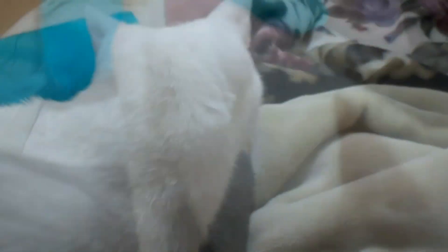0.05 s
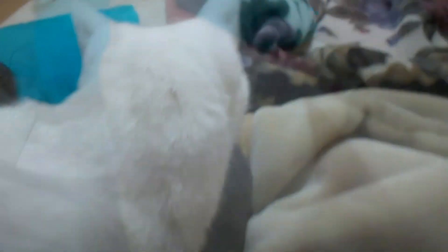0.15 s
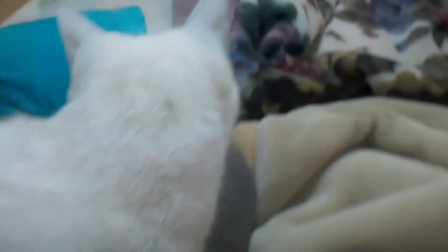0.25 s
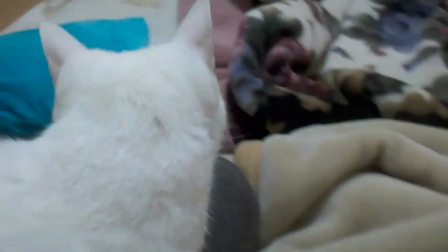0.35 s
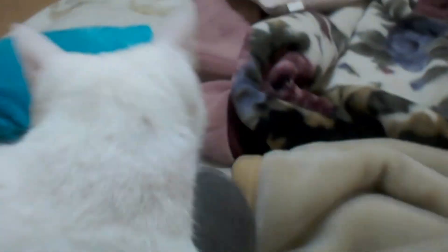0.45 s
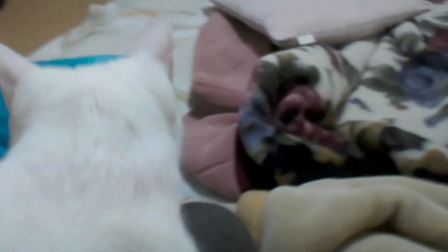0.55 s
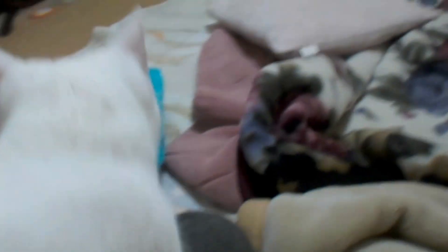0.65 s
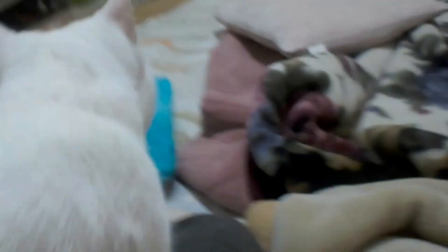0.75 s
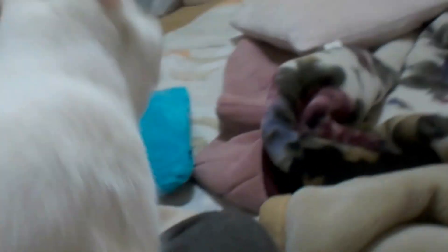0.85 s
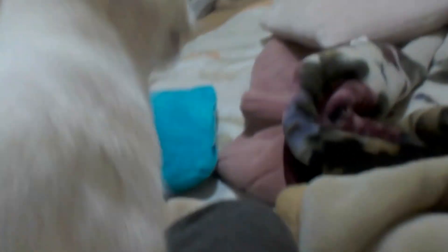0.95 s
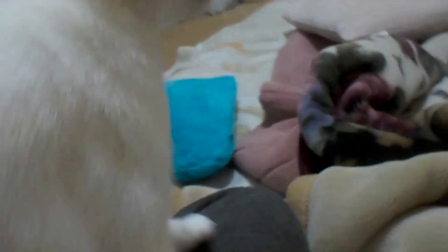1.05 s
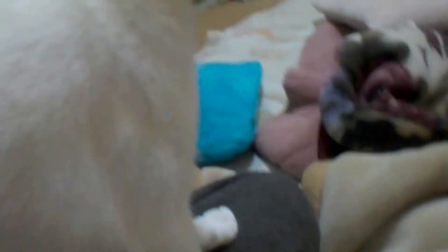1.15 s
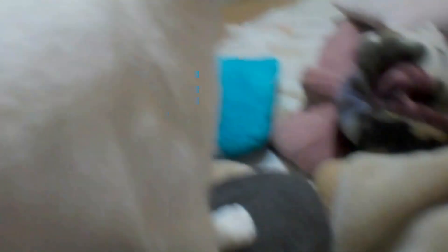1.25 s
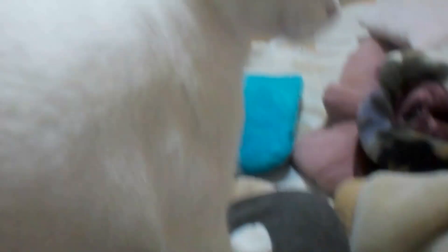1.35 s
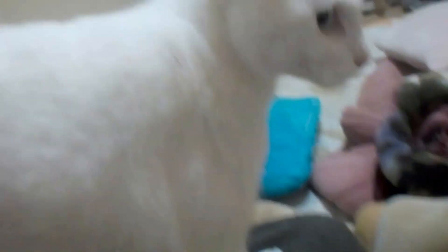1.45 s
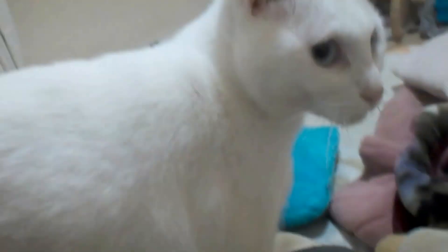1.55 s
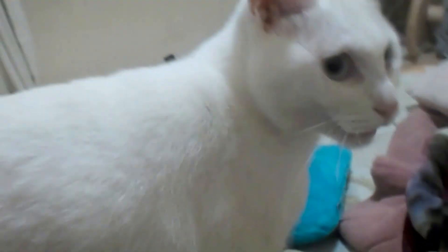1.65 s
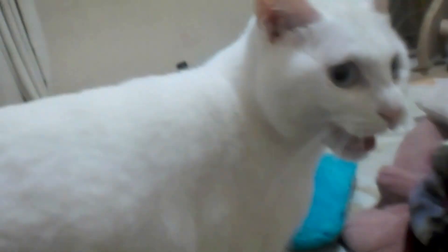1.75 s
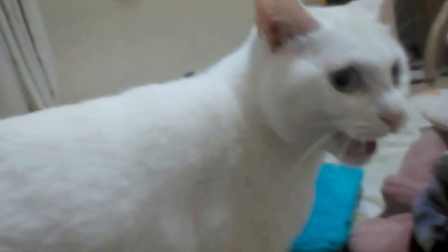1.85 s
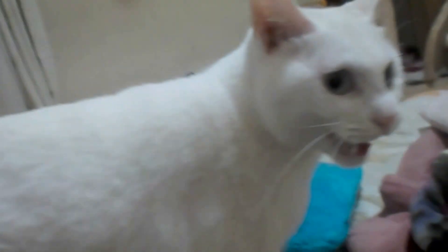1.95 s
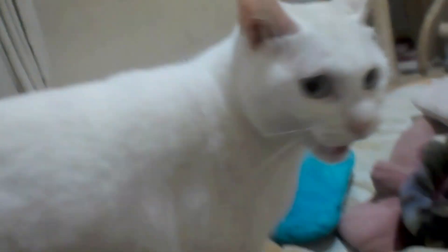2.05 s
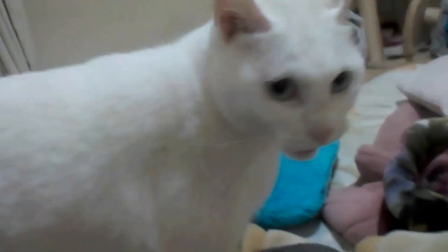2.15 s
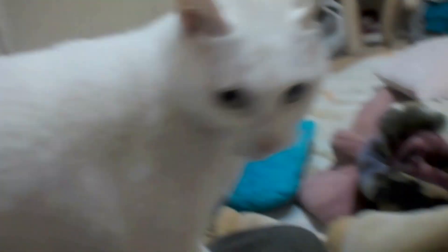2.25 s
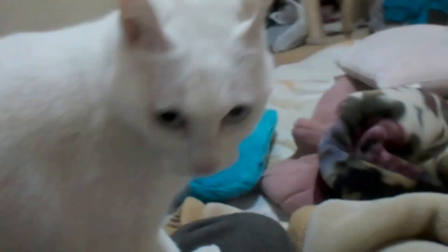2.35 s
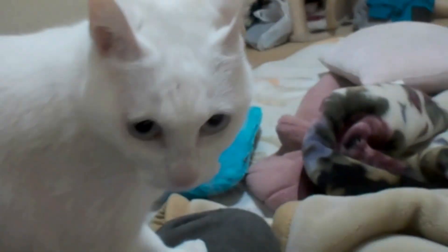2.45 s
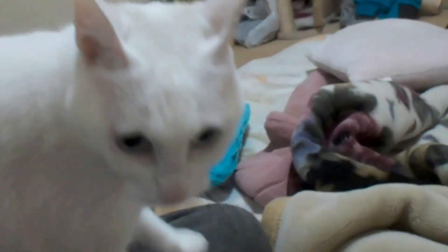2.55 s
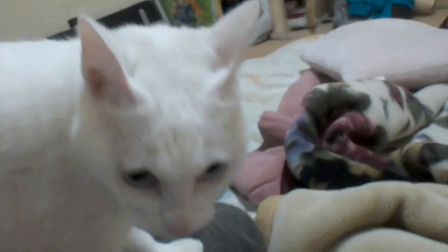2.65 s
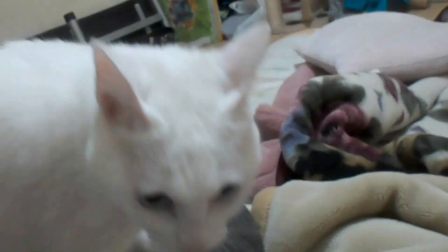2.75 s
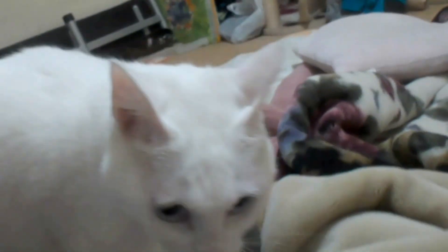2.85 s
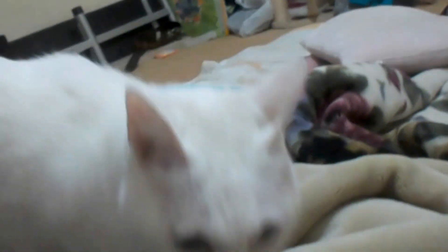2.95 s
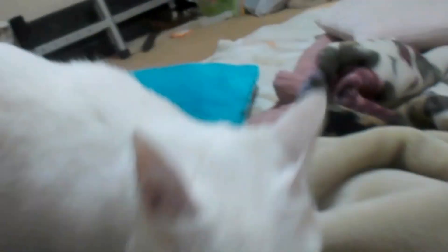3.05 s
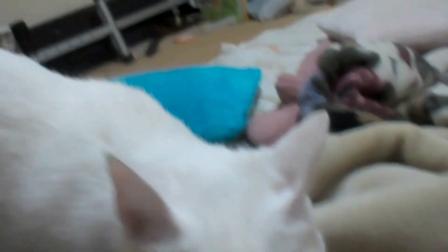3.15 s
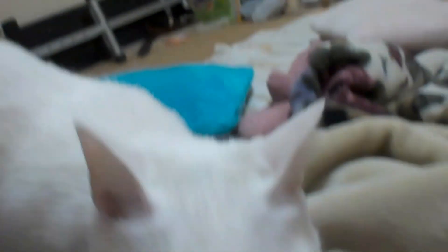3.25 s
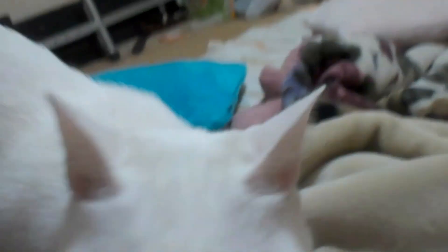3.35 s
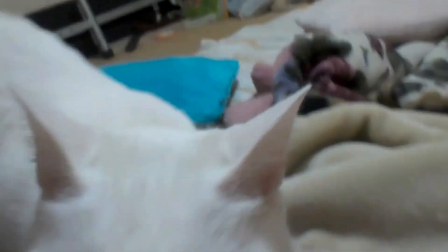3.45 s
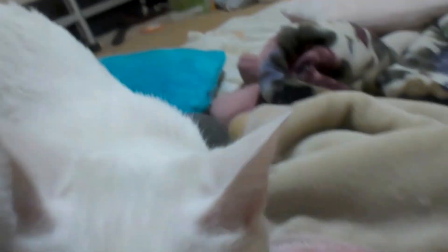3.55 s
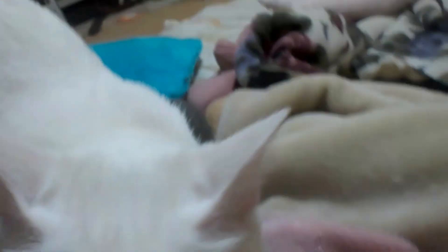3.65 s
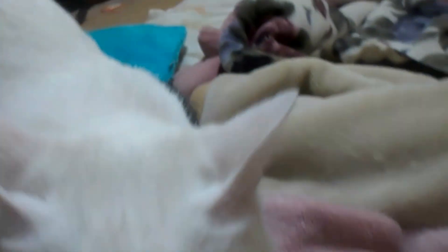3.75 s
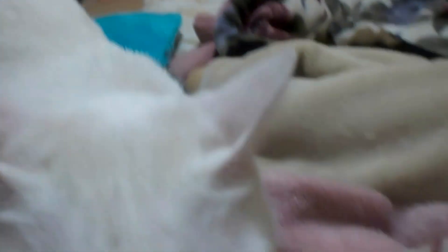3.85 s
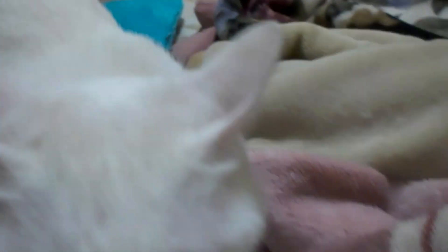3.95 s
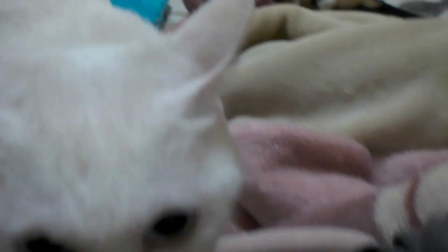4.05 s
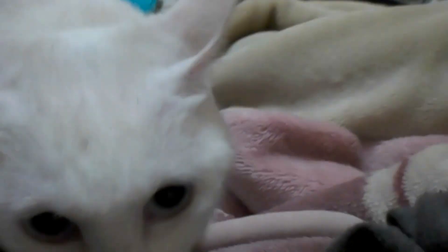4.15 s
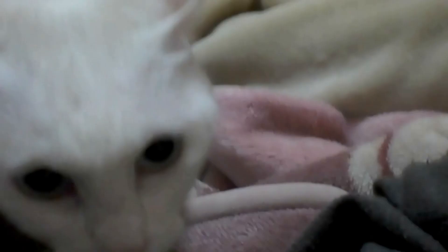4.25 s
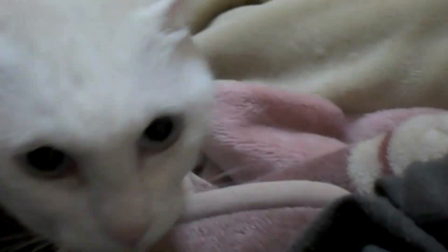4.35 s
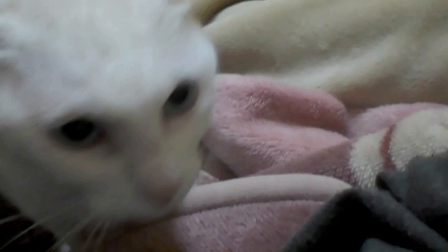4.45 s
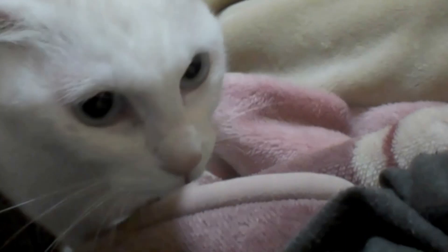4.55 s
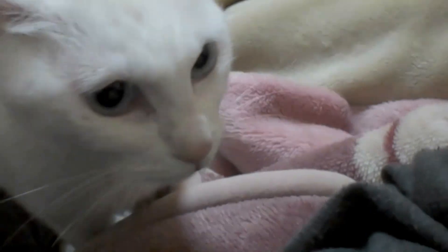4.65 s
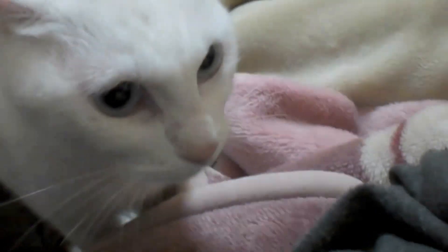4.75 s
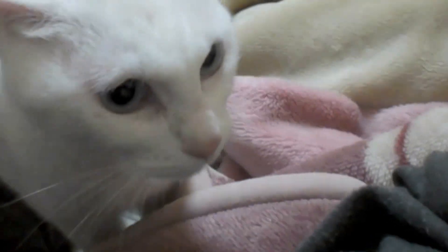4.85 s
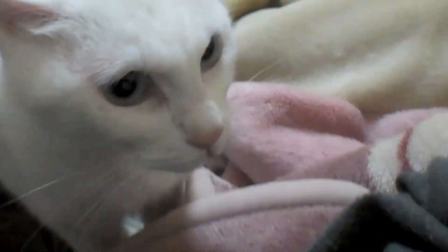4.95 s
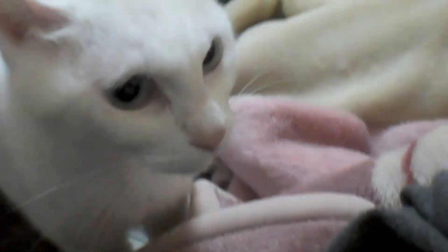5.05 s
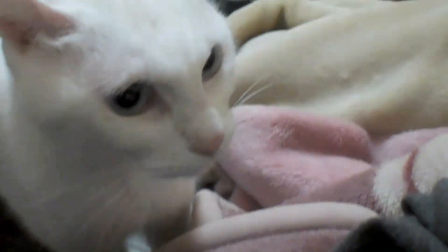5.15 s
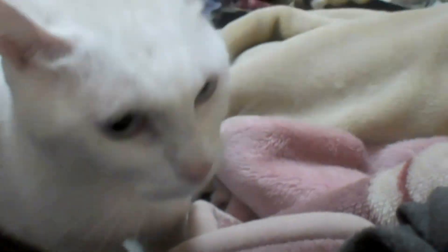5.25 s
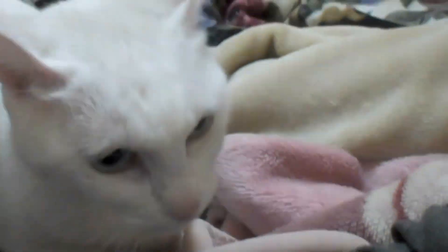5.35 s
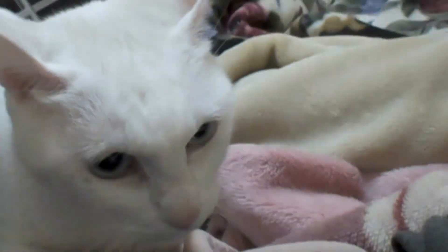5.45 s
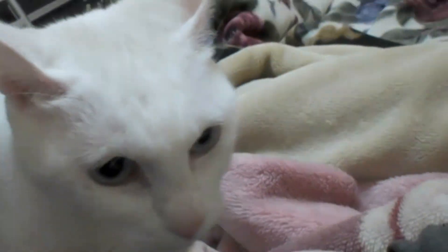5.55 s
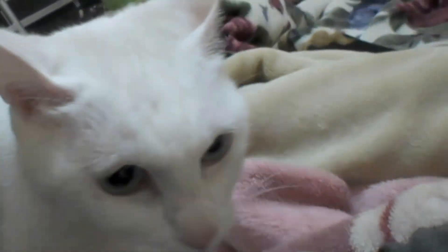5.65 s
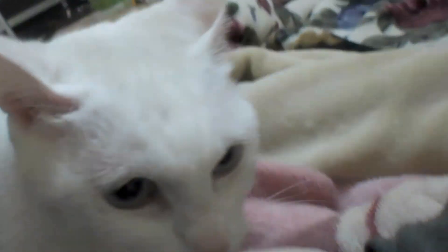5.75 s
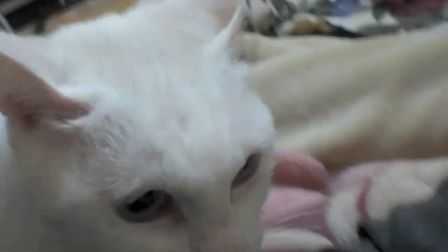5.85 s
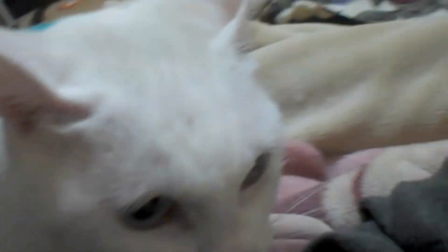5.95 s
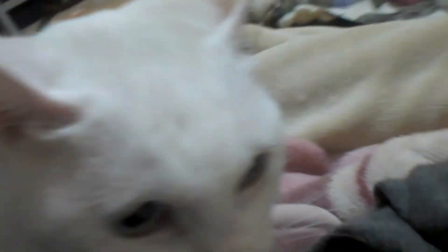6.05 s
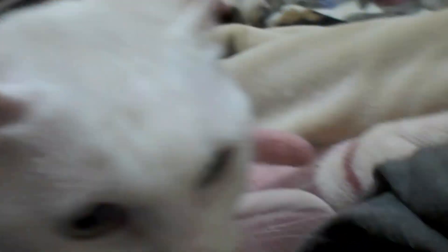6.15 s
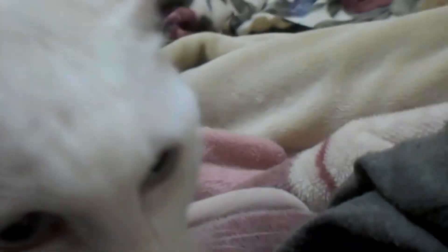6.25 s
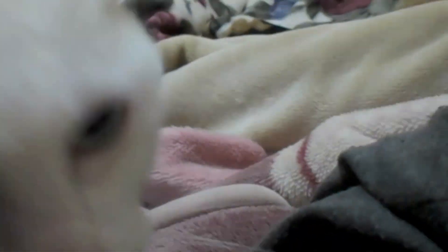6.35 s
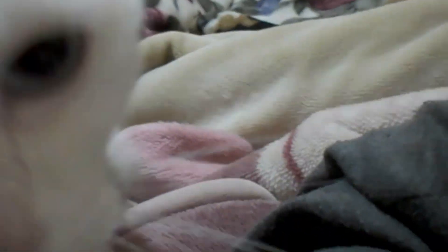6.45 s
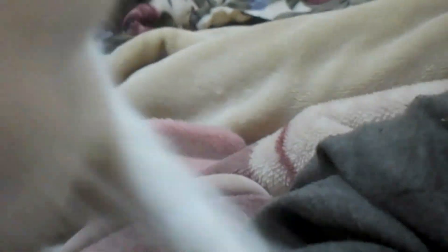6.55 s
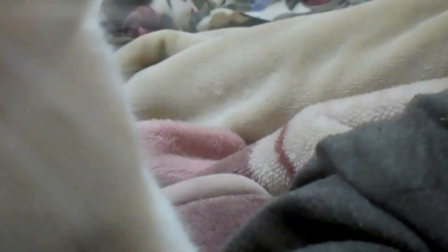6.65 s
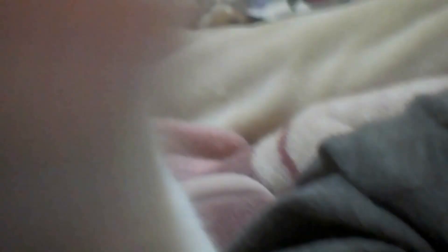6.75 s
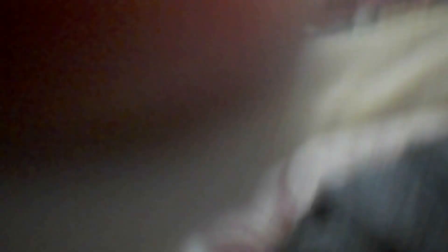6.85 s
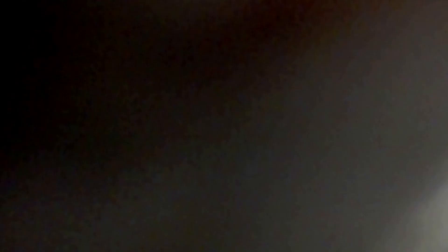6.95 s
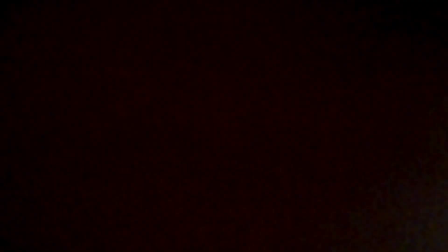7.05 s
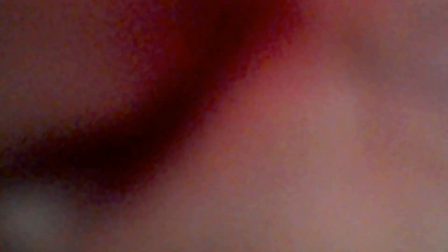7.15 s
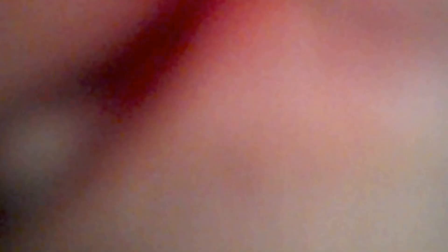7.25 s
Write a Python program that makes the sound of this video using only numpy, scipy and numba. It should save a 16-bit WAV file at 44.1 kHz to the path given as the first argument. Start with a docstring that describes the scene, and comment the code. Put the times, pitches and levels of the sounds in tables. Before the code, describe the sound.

A purring cat gives purr-shaken meows and one hoarse rattle close to a phone, with sharp knocks, ending in fur rubbing and thudding on the microphone.

```python
"""In a small bedroom with a low hum, a purring cat on a blanket meows four times close to a phone.
The meows are vocal fold pulses and breath, chopped and shaken by the purr, through moving resonances;
each call swells, clears, breaks and shuts, and the third is only a hoarse rattle.
The purr is a deep tone with filtered thumps. Knocks on the phone, and three dull purr thumps as the cat
comes close, are short decaying rings; cloth swipes are shaped noise, and at the end the cat rubs its fur
over the microphones as grainy noise."""
import sys
import numpy as np
from scipy import signal
from scipy.fft import rfft, irfft
from scipy.io import wavfile
from scipy.ndimage import uniform_filter1d
from numba import njit

SR = 44100
rng = np.random.default_rng(int(sys.argv[2]) if len(sys.argv) > 2 else 0)


def bounce(signal):
    """Save signal as a 16-bit WAV file at the path given by the first command-line argument."""
    frames = np.transpose(np.atleast_2d(signal))
    limited = np.clip(frames, -1, 1)
    pcm = np.round(limited * 32767).astype(np.int16)
    wavfile.write(sys.argv[1], SR, pcm)


N = 322371
TIME = np.arange(N) / SR


def from_db(db):
    """Decibels to amplitude gain."""
    return 10 ** (np.asarray(db) / 20)


def rms_one(x):
    """Scale to unit power."""
    return x / np.sqrt(np.mean(x ** 2) + 1e-20)


def ramp(t, length):
    """From 0 to 1 over a length of time."""
    return np.clip(t / length, 0, 1)


def curves(rows, t=TIME):
    """Each column of a table, joined by straight lines in time."""
    s, *columns = np.transpose(rows)
    return [np.interp(t, s, c) for c in columns]


def at_hz(points, size):
    """A spectrum table read on the FFT grid of a signal, along log frequency."""
    hz, value = np.transpose(points)
    return np.interp(np.log(np.fft.rfftfreq(size, 1 / SR) + 1), np.log(hz), value)


def colour(x, spectrum):
    """Weight a sound by a smooth spectrum; rms 1."""
    size = x.shape[-1]
    return rms_one(irfft(rfft(x) * from_db(at_hz(spectrum, size)), size))


def cut(x, hz, kind, order=2):
    """Butterworth filter."""
    sos = signal.butter(order, np.clip(hz, 10, .45 * SR), kind, fs=SR, output="sos")
    return signal.sosfilt(sos, x + 1e-18)


def drift(rate_hz, size=N):
    """Random wander with rms 1: straight lines between two random points per cycle of the rate."""
    steps = np.arange(size) * rate_hz * 2 / SR
    return rms_one(np.interp(steps, np.arange(N // 4), rng.standard_normal(N // 4)))


def pan(db):
    """Left and right gains that differ by so many dB, with a mean of 1."""
    gains = from_db(np.array([[.5], [-.5]]) * db)
    return gains / gains.mean(axis=0)


@njit
def sweep(x, angle, r):
    """Two-pole resonance whose centre moves; gain about 1 on top."""
    y = np.zeros(len(x))
    for i in range(2, len(x)):
        drive = (1 - r * r) / 2 * (x[i] - x[i - 2])
        y[i] = drive + 2 * r * np.cos(angle[i]) * y[i - 1] - r * r * y[i - 2]
    return y


def resonate(x, hz, width_hz):
    """A resonance with a steady or moving centre."""
    return sweep(x, 2 * np.pi * hz / SR * np.ones(len(x)), np.exp(-np.pi * width_hz / SR))


def even(x):
    """Hold the short-term power near 1."""
    return x / np.sqrt(np.abs(uniform_filter1d(x * x, size=900)) + 1e-14)


def background(waver_db=2.93, wander_rad=0.27):
    """Room air and a low wavering hum, whose upper lines fade as the cat steps in front of the phone."""
    # spectrum of the room air: (f/Hz, relative level/dB)
    air_colour = [(15,-39.5),(25,-20),(50,-5.5),(75,-4),(236,-16.5),(500,-17.5),(660,-21.5),(1370,-22.5),(3000,-30.5),(7000,-39),(13000,-50),(16000,-61)]
    # room air, which sinks as the cat steps in front of the phone: (t/s, level/dB)
    air_level = [(0,-57),(.5,-54),(1.2,-53.5),(1.7,-57),(4.7,-60.5),(7.31,-57)]
    # hum lines, before they waver: (f/Hz, level at first/dB, level later/dB)
    hum = [(65.5,-54,-53),(107.2,-62,-63),(162.5,-60.5,-75)]
    # likeness of left and right: (f/Hz, likeness 0-1)
    likeness = [(30,1),(500,0.916),(2000,0.64),(5000,0.098),(15000,1)]
    mid, side = rfft(rng.standard_normal((2, N)))
    alike = np.clip(at_hz(likeness, N), 0, 1)
    air = irfft(np.sqrt(1 + alike) * mid + np.sqrt(1 - alike) * side * [[1], [-1]], N)
    out = from_db(curves(air_level)[0]) * colour(air, air_colour)
    for hz, first_db, later_db in hum:
        level_db = np.interp(TIME, [1.05, 1.4], [first_db, later_db]) + waver_db * drift(4)
        line = np.sin(2 * np.pi * hz * TIME + wander_rad * drift(2.4))
        out += np.sqrt(2) * from_db(level_db) * line
    return out


def whine():
    """A faint electronic whine, a tone and its octave, that switches on and off 14.56 times a second."""
    switch = uniform_filter1d(1. * (np.cos(2 * np.pi * 14.56 * (TIME - 2.435)) > .1), size=100)
    phase = 2 * np.pi * 7165 * TIME + .6 * drift(60)
    return from_db(-76) * switch * (np.sin(phase) + from_db(-7) * np.sin(2 * phase))


def purring(closing_db=-6, uneven_db=3, puff=0.077):
    """The larynx opens and closes once a cycle: two soft thumps with a puff of air, over a deep fundamental."""
    # purr speed, before its slight wander: (t/s, f/Hz)
    speed = [(0,31.4),(1.2,31.4),(2.1,28.5),(2.5,29),(3.1,33.2),(3.6,28.3),(4.3,29),(4.9,27.1),(5.6,31.7),(7.3,38.3)]
    # deep fundamental: (t/s, level/dB)
    deep = [(0.0, -71), (1.35, -55), (1.59, -63), (2.37, -49), (3.26, -49.5), (6.09, -63), (6.63, -57),
            (6.65, -54)]
    # thumps and puffs together: (t/s, level/dB)
    flutter_level = [(0,-76),(.35,-53),(.85,-75),(1.2,-59),(1.9,-67),(3.2,-55.5),(4.6,-55),(4.95,-50.5),(5.5,-60.5),(6.2,-64),(6.4,-54.5),(7.3,-48.5)]
    # colour of thumps and puffs: (f/Hz, relative level/dB)
    flutter_colour = [(40,-25.5),(90,7),(140,6.5),(280,-2),(430,-2.5),(600,-22),(1500,-34),(5000,-32.5),(9000,-59)]
    (rate,), (deep_db,), (flutter_db,) = curves(speed), curves(deep), curves(flutter_level)
    turns = np.cumsum(rate * (1 + 0.014 * drift(7.4))) / SR
    opens = np.diff(np.floor(turns), prepend=0)
    closes = np.diff(np.floor(turns + 0.67), prepend=0)
    thumps = (opens + from_db(closing_db) * closes) * from_db(uneven_db * drift(25))
    puffs = puff * rng.standard_normal(N) * np.cos(np.pi * turns) ** 8
    flutter = colour(cut(thumps + 0.44 * puffs, 60, "high"), flutter_colour)
    fundamental = np.sqrt(2) * np.cos(2 * np.pi * turns)
    return from_db(deep_db) * fundamental + from_db(flutter_db) * flutter


def brushes(grain_db=3):
    """Short scratchy swipes of cloth: coloured, grainy noise that starts at once and dies away."""
    # swipes: (t/s, level at the start/dB, time to fall 60 dB/s, left minus right/dB)
    swipes = [(0.55,-51,0.98,-10),(0.568,-34,0.08,-21),(0.593,-45.5,0.49,-7),(3.472,-58.5,0.37,-13),(3.557,-49.5,0.15,-16),(5.18,-47.5,0.042,1)]
    # colour of the cloth: (f/Hz, relative level/dB)
    cloth_colour = [(120, -42), (200, -15), (789, -13), (1240, -5), (1880, -10), (2130, -8.5),
                    (2700, -12.5), (8260, -28.5), (15000, -50)]
    swell = 0
    for s, db, t60, side_db in swipes:
        fade = from_db(db - 60 * np.clip((TIME - s) / t60, 0, 2))
        swell = swell + pan(side_db) * (TIME >= s) * fade
    return swell * colour(rng.standard_normal(N) * from_db(grain_db * drift(600)), cloth_colour)


def knocks_and_thumps(cycles=3.84, crack_t60=0.0029, crack_top_hz=7500, body_db=-20, body_cycles=22,
                      port_lag_s=0.00011):
    """Knocks on the phone and three dull purr thumps: each a ring of a few cycles, a crack and a faint tail."""
    # knocks, and from 6.73 s to 6.804 s the purr thumps of the nearing cat: (t/s,
    # ring level before filtering/dB, ring f/Hz, crack level against ring/dB, left minus right/dB)
    hits = [(0.5691,-16.5,2200,-22,-9),(0.5703,-21.5,507,-27,-9),(0.5762,-17,2610,-23,-24),(.634,-18,1570,-6,-2),(0.649,-2.2,3170,-3,-22),(0.725,-18.5,960,-18,-25),(.860,-22.5,990,-17,-11),(0.9586,-19.5,1100,-21,-12),(1.0332,-24,1580,-30,-1),(2.654,-34,1220,-25,-1),(3.4694,-21.5,1040,-24,-9),(5.179,-40.5,1490,-5,-7.5),(6.73,-25,228.3,-34,-3.5),(6.767,-21.5,197,-37,-4.5),(6.804,-20.5,248,-33,-7),(6.849,-2,3000,-10,-19),(6.8509,-13.5,1980,1.5,-21),(6.8579,-6.5,880,-14,4.5),(6.8984,-2.5,2530,-7.5,-19.5),(6.953,-19,2190,-26,-21),(7.0299,0,675,-43,6),(7.038,0.5,515,-39,-1),(7.0639,-5,890,-40,1),(7.1615,-30,890,-27,8),(7.2319,-3.5,1150,-38,3)]
    out, t = np.zeros((2, N)), np.arange(2400) / SR
    for s, db, hz, crack_db, side_db in hits:
        crack, tail = rng.standard_normal((2, len(t)))
        hit = np.sin(2 * np.pi * hz * t) * from_db(-60 * t * hz / cycles)
        # few overtones keep the onset soft
        hit = cut(cut(hit, hz / 4, "high", order=1), hz * 5, "low")
        crack = cut(crack, [1500, crack_top_hz], "band") * from_db(-60 * t / crack_t60)
        hit += from_db(crack_db) * crack / np.abs(crack).max()
        tail = rms_one(cut(tail, [hz / 2, hz * 2], "band"))
        hit += from_db(body_db - 60 * t * hz / body_cycles) * tail
        hit = cut(hit, 11000, "low", order=4)
        # the sound reaches the left port a little later
        both = np.array([np.interp(t - port_lag_s, t, hit, left=0), hit])
        at = int(s * SR)
        out[:, at:at + len(t)] += (from_db(db) * both * pan(side_db))[:, :N - at]
    return out


def loudness(age, effort, strength):
    """Mouth, throat and treble levels in dB: the bright parts follow effort more than the throat does."""
    throat_follows, treble_follows, treble_sags = 0.41, 0.73, 0.13  # shares of the mouth's swell and sag
    _, swell_s, sag_s, swell_db, sag_db, release_t60 = effort
    swell = swell_db * (1 - ramp(age, swell_s)) ** 2
    sag = sag_db * ramp(age - swell_s, sag_s) ** 2
    release = 60 * np.maximum(age - swell_s - sag_s, 0) / release_t60
    mouth_db, throat_db, treble_db, _ = strength
    return (mouth_db - swell - sag - release, throat_db - throat_follows * swell - release,
            treble_db - treble_follows * swell - treble_sags * sag - release)


def hoarseness(age, voicing, catch_width_s, break_width_s=0.013):
    """Roughness and purr depth: hoarse at both ends, clearer between, with the purr creeping back in."""
    catch_s, clear_s, clear_rough, hoarse_rough, clear_purr, hoarse_purr = voicing
    caught = (1 + np.tanh((age - catch_s) / (2 * catch_width_s))) / 2
    unbroken = (1 - np.tanh((age - catch_s - clear_s) / (2 * break_width_s))) / 2
    clear = caught * unbroken
    rough = clear * clear_rough + (1 - clear) * hoarse_rough
    purr = clear * clear_purr * ramp(age - catch_s, clear_s) + (1 - clear) * hoarse_purr
    return np.clip(rough, 0, 1), np.clip(purr, 0, 1)


def resonances(age, length, jaw, closing_s=0.12, wobble=0.027, wobble_hz=9, fourth_follows=0.48):
    """The mouth's resonances climb as the jaw opens; the lower two waver, and fall again as it shuts."""
    second_hz, third_hz, fourth_hz, open_s, second_rise, third_rise, fall = jaw
    closed = (1 - ramp(age, open_s)) ** 2
    # the jaw starts to shut a little before the release
    shut = 1 - fall * np.clip((age - length + closing_s) / closing_s, 0, 2)
    second_wobble, third_wobble = (1 + wobble * drift(wobble_hz, len(age)) for _ in range(2))
    return (second_hz * (1 - second_rise * closed) * shut * second_wobble,
            third_hz * (1 - third_rise * closed) * shut * third_wobble,
            fourth_hz * (1 - fourth_follows * second_rise * closed))


def purr_gate(cycles, open_share, snap_share=0.041, shut_share=0.34):
    """The larynx snaps open and closes more slowly, once a purr cycle; shares are of that cycle."""
    since = (cycles + .5) % 1 - .5 + open_share / 2
    return ramp(since, snap_share) * (1 - ramp(since - open_share + shut_share / 2, shut_share))


def meow(pitch, throat, beat, effort, strength, voicing, jaw, mouth):
    """Vocal fold pulses and air, chopped by the purr, through the throat and a mouth that opens and closes."""
    # overtones above the mouth resonances: (f/Hz, relative level/dB)
    treble_colour = [(3500,-26),(4100,0),(4750,-3),(5500,-1),(6300,-5.5),(7100,-5.5),(7550,-14.5),(8800,-17),(9600,-23.5),(14000,-38)]
    jitter, shake, shimmer_db, catch_width_s = 0.02156, 0.1236, 4, 0.023
    nasal_hz, nasal_fade_db_per_s = 1620, 20
    fifth_width_hz, fifth_rise_hz_per_s = 750, 1570
    hiss, onset_s, burst_growth = 0.81, 0.0046, 0.33
    start, swell_s, sag_s, _, _, release_t60 = effort
    (valley_hz, top_hz, second_width_hz, third_width_hz, third_db, fourth_db,
     nasal_db, fifth_hz, fifth_db) = mouth
    span = (TIME >= start) & (TIME <= start + swell_s + sag_s + release_t60)
    t = TIME[span]
    size, age = len(t), t - start
    f0, = curves(pitch, t)
    mouth_db, throat_db, treble_db = loudness(age, effort, strength)
    second_hz, third_hz, fourth_hz = resonances(age, swell_s + sag_s, jaw)
    rough, purr = hoarseness(age, voicing[:-1], catch_width_s)

    # each purr cycle briefly shuts the larynx; bursts lengthen through the swell
    cycles = beat[1] * (t - beat[0])
    open_share = voicing[-1] * (1 - burst_growth * (1 - ramp(age, swell_s)))
    opening = 1 - purr * (1 - purr_gate(cycles, open_share))
    opening /= np.sqrt(np.abs(uniform_filter1d(opening ** 2, size=1500)) + 1e-6)
    # a burst dips in pitch before the tone catches and arches after
    bend = shake * purr * np.cos(2 * np.pi * cycles) * np.tanh((age - voicing[0]) / catch_width_s)
    unsteady = (0.0041 + jitter * 2 * rough) * drift(170, size) + .012 * purr * drift(45, size)
    phase = 2 * np.pi * np.cumsum(f0 * (1 + bend + unsteady)) / SR
    pulses = rms_one(sum(np.cos(k * phase) for k in np.arange(1, 27)))
    pulses *= from_db(shimmer_db * rough * drift(200, size))

    # air escapes in puffs, once per vibration of the folds; less of it reaches the low resonances
    air = cut(rng.standard_normal(N)[span], 11000, "low")
    air = rms_one(air * (1 + .7 * np.cos(phase)))
    source = np.sqrt(1 - rough ** 2) * pulses + rough * air
    deep = np.sqrt(1 - rough ** 4) * pulses + rough ** 2 * air

    # neighbouring throat resonances have opposite signs
    low = sum((-1) ** k * from_db(db) * resonate(deep, hz, width)
              for k, (hz, width, db) in enumerate(throat))
    low = cut(cut(low, 1230, "low", order=6), 193, "high", order=4)

    bright = resonate(source, second_hz, second_width_hz)
    bright -= from_db(third_db) * resonate(source, third_hz, third_width_hz)
    bright = cut(cut(bright, valley_hz, "high", order=8), top_hz, "low", order=7)
    nasal = resonate(resonate(source, nasal_hz, 190), nasal_hz, 190)
    bright += from_db(nasal_db - nasal_fade_db_per_s * (age - swell_s)) * nasal

    overtones = source + hiss * cut(air, 5200, "high", order=4)
    fourth = from_db(fourth_db) * resonate(overtones, fourth_hz, 490)
    treble = colour(overtones + fourth, treble_colour)
    # the highest resonance creeps up through the call
    fifth_hz = fifth_hz + fifth_rise_hz_per_s * age
    fifth = resonate(resonate(overtones, fifth_hz, fifth_width_hz), fifth_hz, fifth_width_hz)
    treble += from_db(fifth_db) * rms_one(fifth)

    voice = from_db(throat_db) * even(low) + from_db(mouth_db) * even(bright)
    voice += from_db(treble_db) * even(treble)
    out = np.zeros(N)
    out[span] = voice * opening * ramp(age, onset_s)
    return out * pan(strength[-1])


def meows():
    """A soft meow turned away, a full one, a hoarse rattle with its trail, low croaks into a last meow."""
    # voice pitch before shake and jitter: (t/s, f/Hz)
    soft_pitch = [(0.67, 403), (0.7, 443.0), (0.866, 483), (0.916, 460.7), (1.074, 443), (1.1, 383.6)]
    full_pitch = [(1.8, 342), (1.81, 349), (1.856, 463), (1.894, 520.8), (1.93, 534), (2.072, 477.6),
                  (2.288, 427), (2.318, 432), (2.38, 396)]
    rattle_pitch = [(3.75,330),(4.1,392.3),(4.451,356.6)]
    last_pitch = [(5.681,418),(5.759,351.3),(5.88,396.8),(5.951,411.3),(5.979,440.4),(6.03,451),(6.089,459.3),(6.169,444.4),(6.29,398.6)]
    # throat resonances: (f/Hz, width/Hz, relative level/dB)
    soft_throat = [(483,200,-7),(935,93,-0.5)]
    full_throat = [(470,200,-15),(960,240,27)]
    rattle_throat = [(349,175,1.6),(830,266,3.4)]
    croak_throat = [(437.4,130,0)]
    last_throat = [(385,280,-0.25),(930,310,1.2)]
    # Rows below: soft meow, full meow, rattle, its faint trail, low croaks, last meow.
    # purr under each call: (t of one burst/s, f/Hz)
    beats = [(.9,28),(2.362,30.2),(3.792,29.9),(4.575,29.2),(5.587,31.2),(5.75,31.2)]
    # effort swells, sags and is released: (start t/s, swell length/s, sag length/s,
    # mouth swell depth/dB, mouth sag depth/dB, time to release by 60 dB/s)
    efforts = [(.66,0.18,0.21,11.5,6.5,0.31),(1.791,0.22,0.32,19.5,7,0.18),(3.755,0.41,.18,21,4.5,0.34),(4.564,0.025,0.14,-7,6,0.16),(5.575,0.065,0.056,2,-9,0.16),(5.705,.42,.15,22.5,9.5,0.067)]
    # strength at the crest: (mouth level/dB, throat level/dB, treble level/dB, left minus right/dB)
    strengths = [(-40,-56.5,-69.5,1.5),(-30,-43,-57.5,2),(-40,-46,-53.5,0.1),(-68.5,-84,-80,.5),(-69,-49.5,-79,-0.5),(-31.5,-42,-53.5,0.3)]
    # the folds catch, then break: (catch delay/s, clear length/s, clear roughness 0-1,
    # hoarse roughness 0-1, purr depth at the end of the clear part 0-1, hoarse purr depth 0-1,
    # open share of a purr cycle after the swell 0-1)
    voicings = [(0.053,0.258,0.08,0.64,.25,0.34,0.86),(.04,0.429,.05,.62,0.22,0.44,0.85),(0.152,0.28,.88,0.96,1,0.88,0.78),(0.036,0.089,.7,.7,1,1,0.35),(0.025,0.067,0.8,0.77,1,1,0.75),(.262,0.2135,0.02,0.63,0.13,0.56,0.85)]
    # the jaw opens and shuts: (second resonance f/Hz, third f/Hz, fourth f/Hz, opening length/s,
    # rise of the second 0-1, rise of the third 0-1, closing fall by the release 0-1)
    jaws = [(2090,3580,6500,.18,0.03,0.27,0.14),(2447,3600,4200,0.11,0.31,0.1,0.11),(1710,2840,5560,.33,0.4,0.44,.03),(2200,2960,5000,0.022,.02,0.2,0.25),(1370,1700,5000,0.1,0.1,0.3,.01),(1948,3040,5250,0.4,0.38,0.22,0.1)]
    # colour of the mouth: (valley f/Hz, top f/Hz, second width/Hz, third width/Hz, third level/dB,
    # fourth level/dB, nasal level at the crest/dB, fifth f at the start/Hz, fifth level/dB)
    mouths = [(1150,3600,920,310,-10,0,-2,11000,-19),(1580,4300,290,460,-8.5,7.5,-9,6470,-15),(1296,3270,116,235,0,14.5,-10,5300,-21),(1990,3200,270,150,7,-1,-33,4600,-15),(900,2600,200,370,-2,0,-20,7400,-15),(1430,4730,143,377,-7.5,6,-19,6470,-8)]
    pitches = soft_pitch, full_pitch, rattle_pitch, rattle_pitch, last_pitch, last_pitch
    throats = soft_throat, full_throat, rattle_throat, rattle_throat, croak_throat, last_throat
    calls = zip(pitches, throats, beats, efforts, strengths, voicings, jaws, mouths)
    return sum(meow(*call) for call in calls)


def grunts(length_s=0.0037, overtone_db=-9, again_s=0.027, again_hz=350, again_loss_db=8):
    """The larynx closes with a few low cycles as the voice stops; a slacker grunt follows a purr cycle later."""
    # grunts: (t/s, level/dB, f/Hz)
    closings = [(1.09,-42,408),(2.364,-31,830),(4.327,-30.5,361),(6.271,-28.5,402)]
    out = np.zeros(N)
    slacker = [(s + again_s, db - again_loss_db, again_hz) for s, db, _ in closings]
    for s, db, hz in list(closings) + slacker:
        near = np.abs(TIME - s) < .04
        t = TIME[near] - s
        tone = np.sin(2 * np.pi * hz * t) + from_db(overtone_db) * np.sin(4 * np.pi * hz * t)
        out[near] += from_db(db) * np.exp(-.5 * (t / length_s) ** 2) * tone
    return out


def fur(buffet_pan_db=-12, grain_db=2, shared=0.87):
    """Hairs scrape over the ports in tiny slips while the cat's body pushes air into them."""
    # strokes: (t/s, hold length/s, buffeting level before its low-pass/dB, rubbing level/dB,
    # hiss level/dB, left minus right of the hiss/dB; the rubbing takes half of that)
    strokes = [(6.79,0.02,-47,-54.5,-63,-3),(6.843,0.0099,-19.5,-46,-34,-1),(6.898,0.11,-29.5,-35,-37.5,-26),(7.003,.026,-22.5,-31.5,-34,-5),(7.062,0.051,-44,-37,-47.5,3),(7.158,0.088,-48,-35.5,-45,-3),(7.235,0.011,-45,-31,-45,-1.5)]
    # colour of the rubbing: (f/Hz, relative level/dB)
    rub_colour = [(100,-24),(250,8.5),(600,8.5),(1200,2.5),(2200,-8),(3500,-8),(6000,-43)]
    # colour of the hiss: (f/Hz, relative level/dB)
    hiss_colour = [(1000,-1),(2000,2),(3700,2),(5000,-1.5),(7300,-3.5),(9500,-8),(12000,-20),(14000,-28),(15500,-60)]
    rise_s, stroke_t60, buffet_t60 = 0.069, 0.26, .09  # time to climb and to die by 60 dB
    push = scrape = swish = 0
    for s, hold_s, low_db, mid_db, high_db, side_db in strokes:
        early, late = np.clip(s - TIME, 0, 1), np.clip(TIME - s - hold_s, 0, 1)
        contact = from_db(-60 * (early / rise_s + late / stroke_t60))
        push = np.maximum(push, from_db(low_db - 60 * (early / rise_s + late / buffet_t60)))
        scrape = np.maximum(scrape, from_db(mid_db) * contact * pan(.5 * side_db))
        swish = np.maximum(swish, from_db(high_db) * contact * pan(side_db))

    def slips(common):
        """Grainy noise, partly shared by the two ports."""
        noise = common * rng.standard_normal(N) + rng.standard_normal((2, N))
        return noise * from_db(grain_db * drift(250))

    rumble = rms_one(cut(cut(slips(shared), 20, "low", order=1), 9.5, "high"))
    buffet = push * rumble * pan(buffet_pan_db)
    # now and then a hair catches and lets go with a snap, about 90 times a second
    snags = (rng.random(N) < 90 / SR) * rng.uniform(0.88, 1, N) * from_db(24.0)
    rub = scrape * colour(slips(shared) + snags, rub_colour)
    hiss = swish * colour(slips(0), hiss_colour)
    return cut(buffet, 215, "low") + rub + hiss


def bedroom(x, t60=0.17, wet_db=-17):
    """A short, soft tail of reflections as decaying noise, different at each microphone."""
    t = np.arange(SR // 2) / SR
    tail = cut(rng.standard_normal((2, len(t))), 4200, "low") * from_db(-60 * t / t60) * (t > .003)
    tail /= np.sqrt(np.sum(tail ** 2, axis=1, keepdims=True))
    return x + from_db(wet_db) * signal.fftconvolve(x.mean(axis=0)[None], tail, axes=1)[:, :N]


def scene():
    """The cat's voice in the room, plus its purr, knocks, thumps, cloth and fur, the background and the whine."""
    voice = bedroom(meows() + grunts())
    return voice + purring() + knocks_and_thumps() + brushes() + fur() + background() + whine()


def record(dry, stop_hz=16700):
    """Full scale clips the peaks; a steep low-pass then removes the top, 70 dB down from stop_hz."""
    top_cut = signal.cheby2(14, 70, stop_hz, fs=SR, output="sos")
    return signal.sosfilt(top_cut, np.clip(dry, -1, 1))


dry = scene()
out = record(dry)
bounce(out)
```